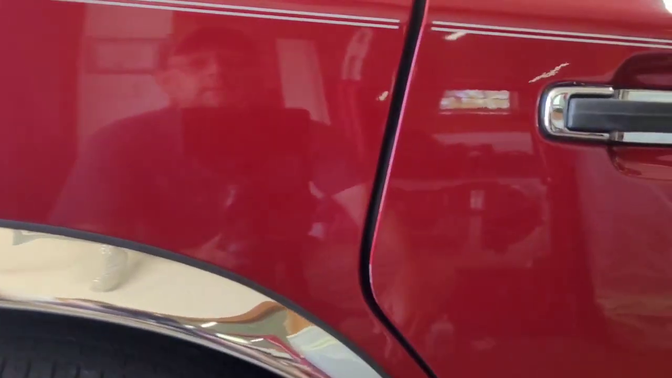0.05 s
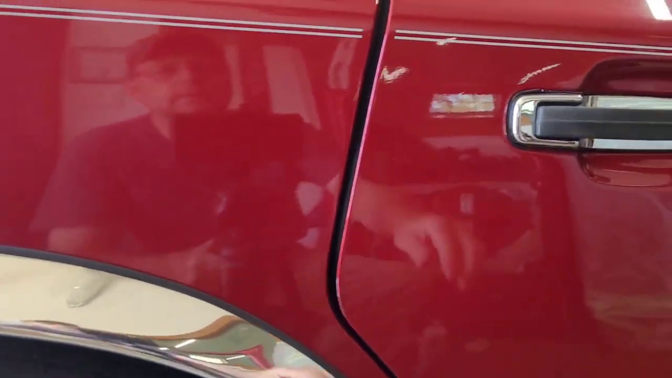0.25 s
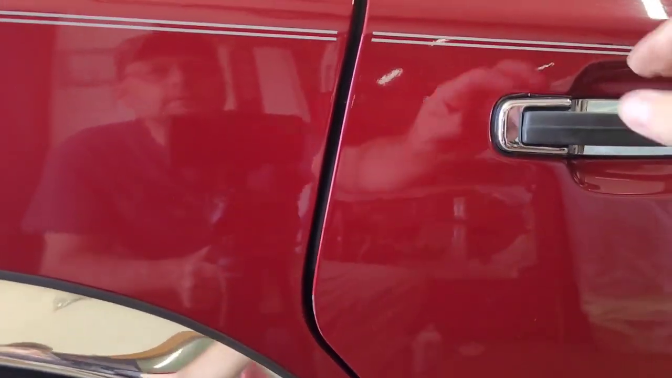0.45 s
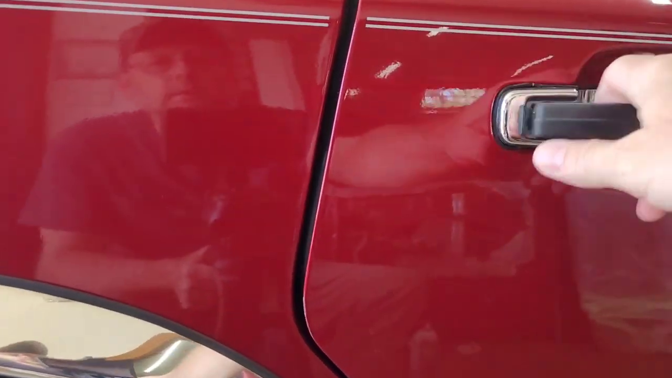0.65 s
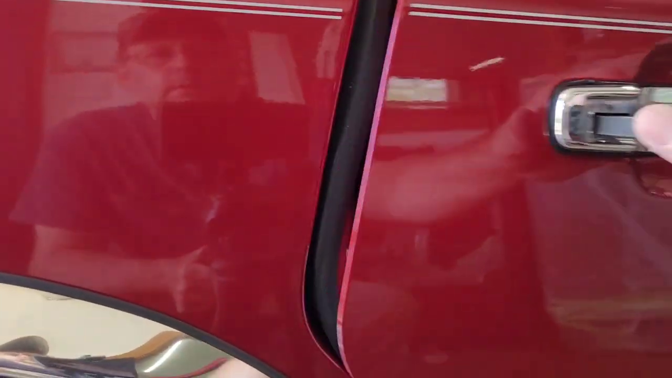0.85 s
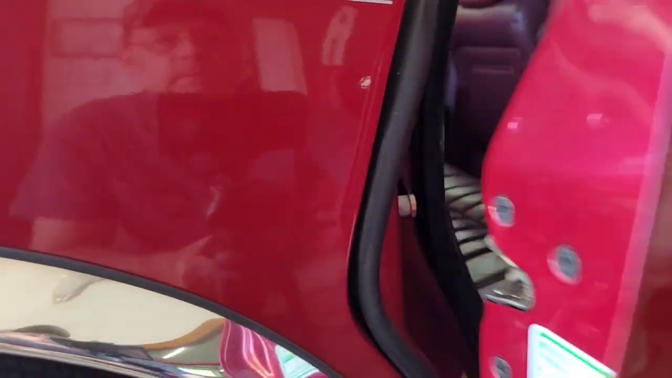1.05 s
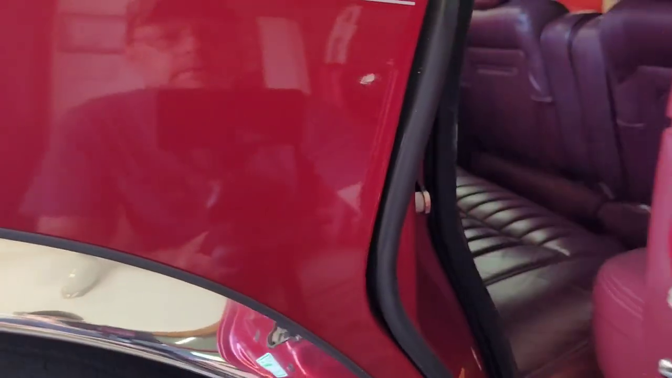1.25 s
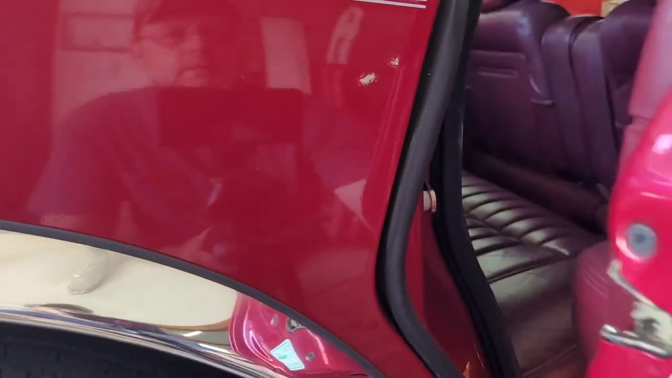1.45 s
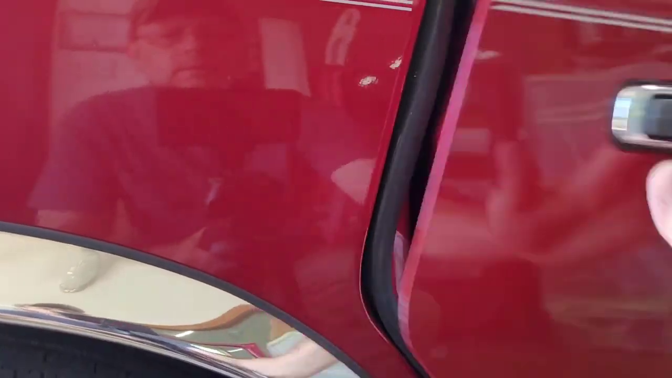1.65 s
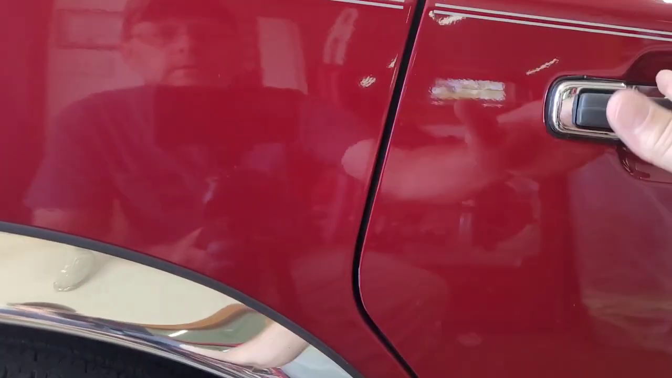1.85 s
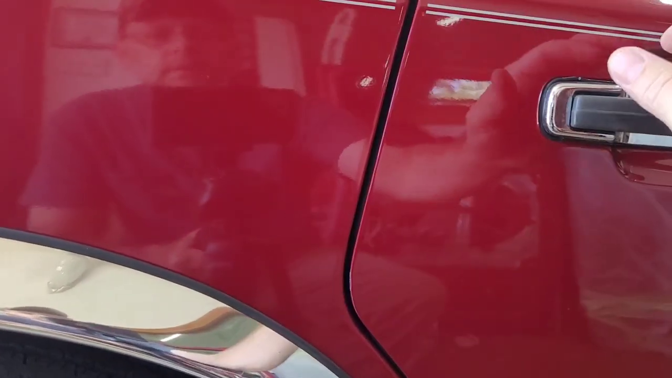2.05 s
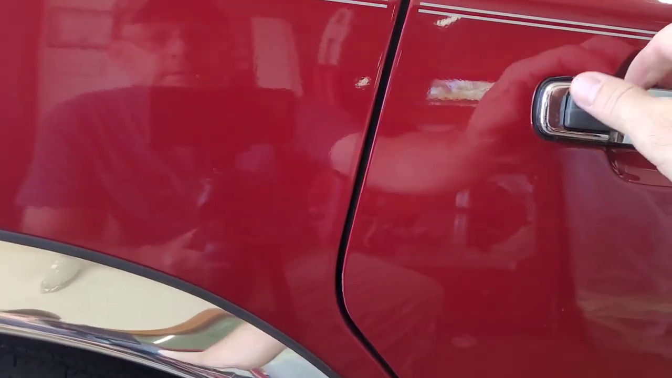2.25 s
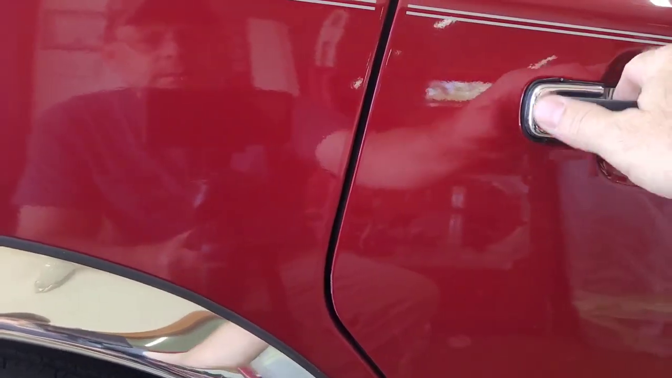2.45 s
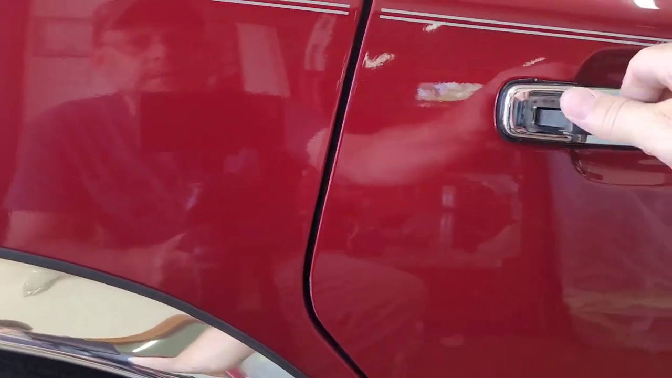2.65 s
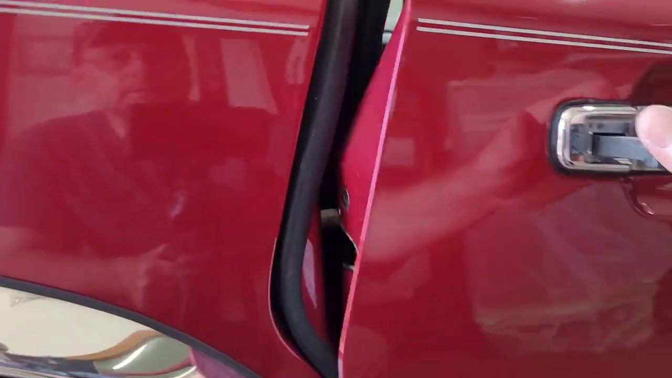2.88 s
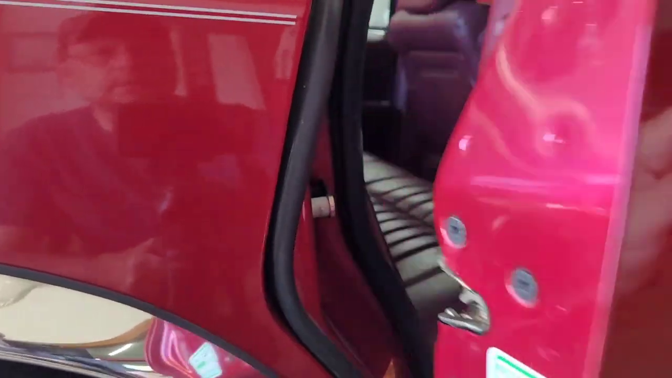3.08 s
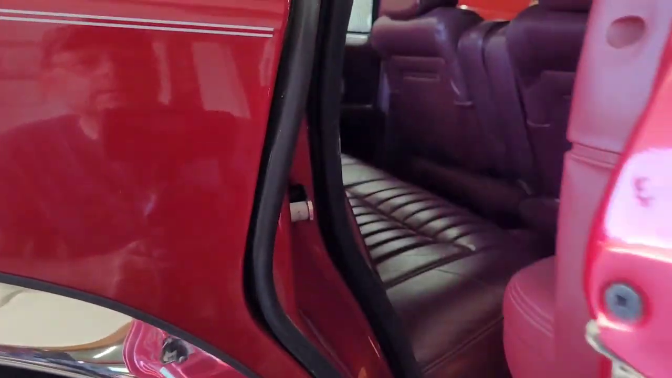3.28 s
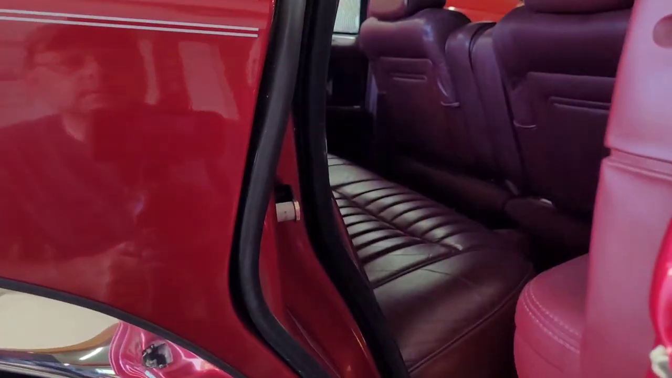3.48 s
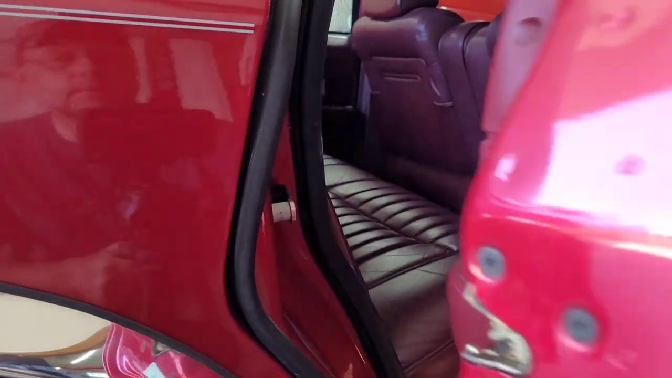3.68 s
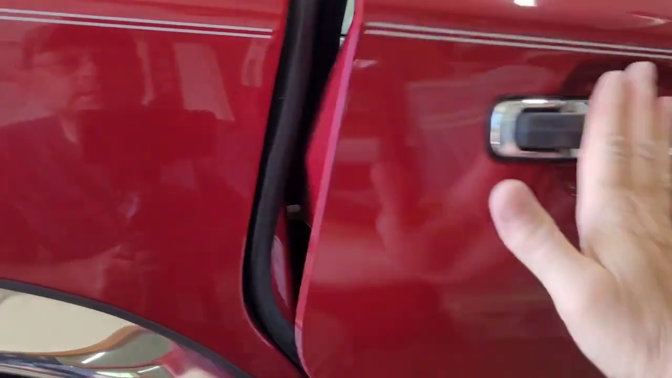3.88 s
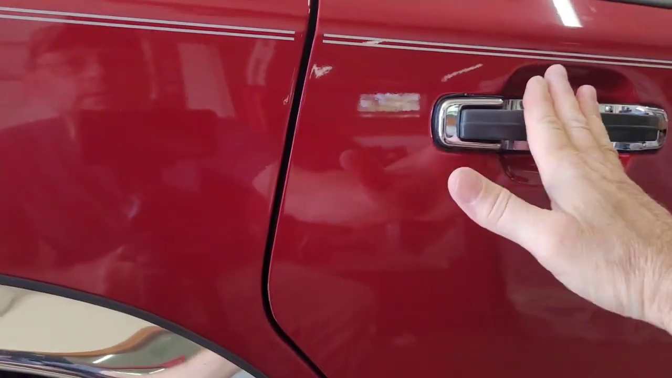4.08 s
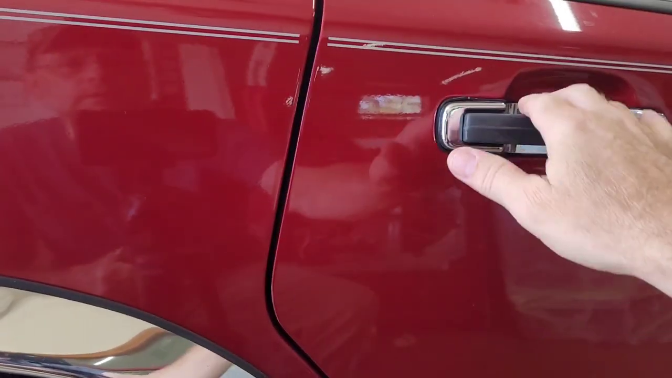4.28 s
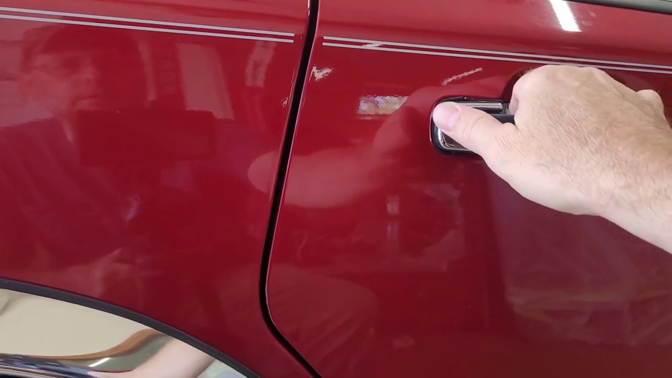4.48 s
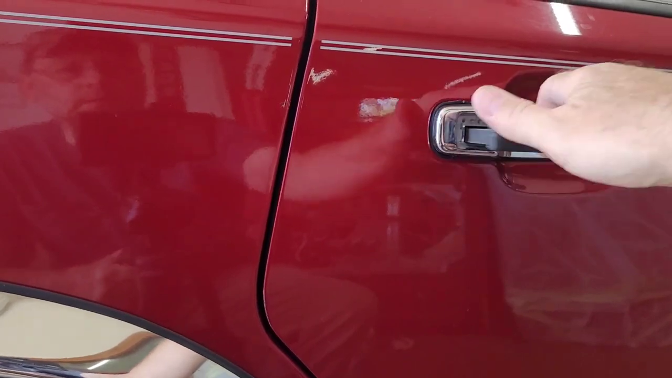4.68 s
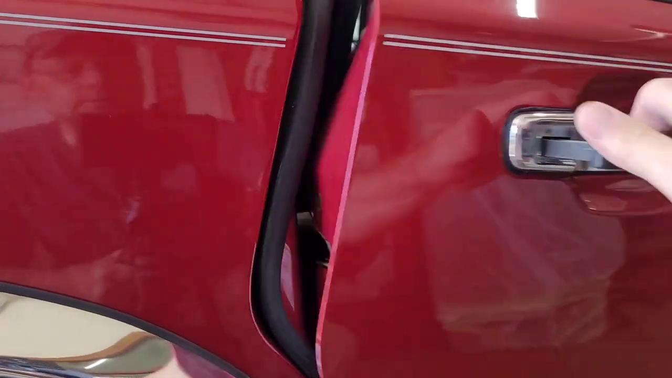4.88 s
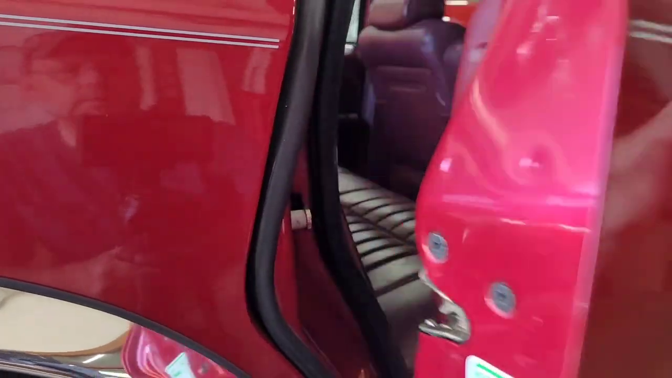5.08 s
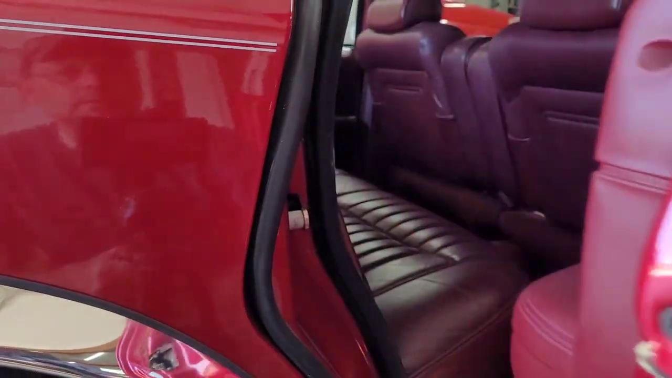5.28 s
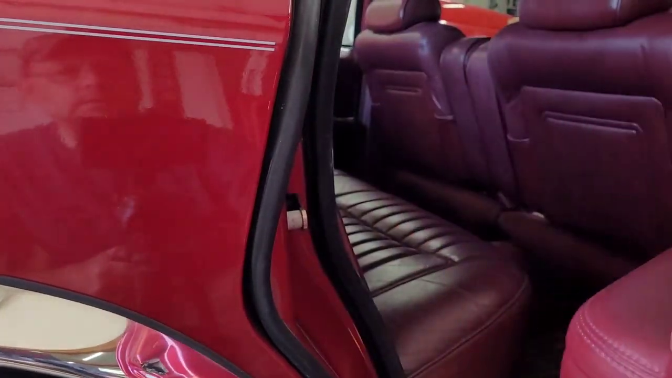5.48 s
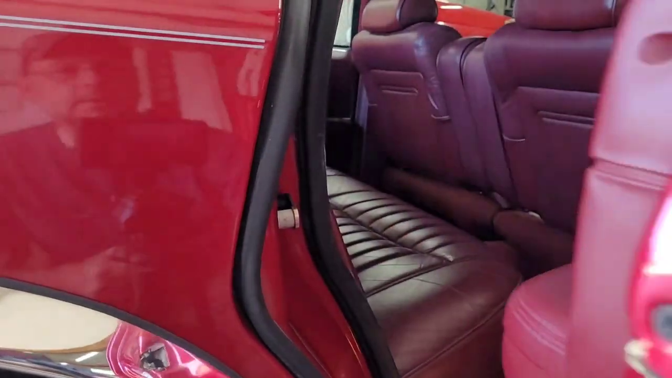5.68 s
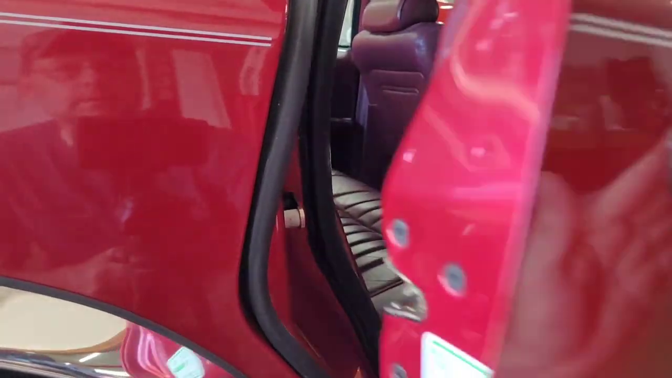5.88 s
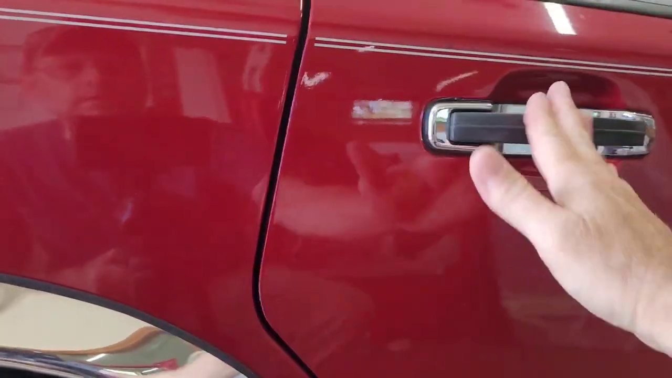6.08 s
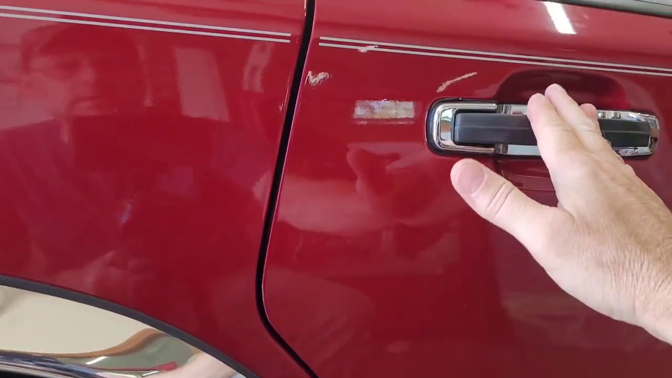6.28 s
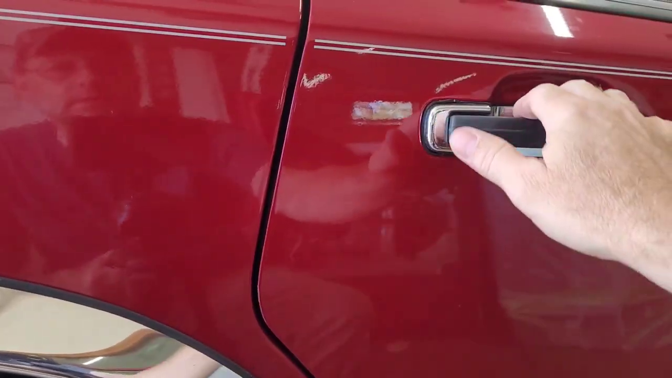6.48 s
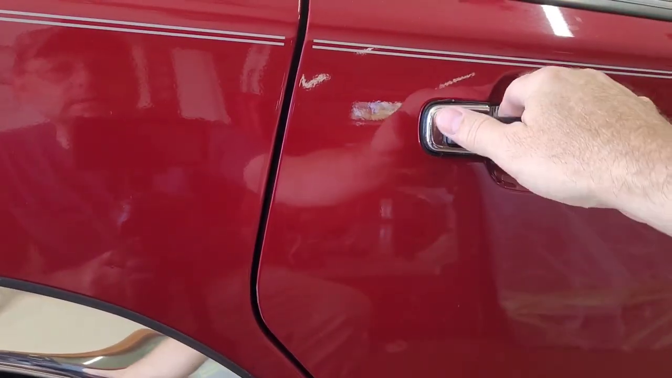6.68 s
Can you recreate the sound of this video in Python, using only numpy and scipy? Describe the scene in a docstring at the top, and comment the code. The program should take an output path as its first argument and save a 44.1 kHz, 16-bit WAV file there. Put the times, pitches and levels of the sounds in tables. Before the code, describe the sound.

Close, wide stereo in a quiet garage with very faint hiss and hum. At 0 s the low tail of an earlier door slam dies away, with a soft sleeve brush and tiny tick around 0.25 s. At 0.7-0.85 s a cluster of metallic handle and latch clicks snaps, the rubber seal popping and peeling with a low, fluttering puff. At 1.1 s the door stay gives a loud, hollow double clunk with ringing sheet metal. After a soft bump or two, the door slams at 1.74 s: bright latch clack, then a deep, tight thump, cabin boom, brief panel rattle and short echo. Lighter handle clicks at 2.6-2.8 s, clunk at 3.1 s, faint cloth, slam at 4.0 s. Clicks with a sharper latch snap at 4.7-4.8 s, clunk at 5.1 s, final slam at 6.1 s, its low tail and room echo fading into quiet by the end, about 6.6 s.

```python
"""Car door in a quiet garage

A car door is opened and shut three times, close to a two-port microphone; an earlier slam dies away at the start.
Shaped noise makes the clicks, the peeling seal, the cloth and the rush of air; decaying tones ring the metal parts.
The door stay clunks over its detent, then the latch clacks on the striker and the door thumps into its seal.
A diffuse noise tail makes the garage echo, and hiss with two faint hum tones makes its quiet."""
import sys
import numpy as np
from scipy import signal
from scipy.fft import rfft, irfft, next_fast_len
from scipy.io import wavfile
from scipy.ndimage import uniform_filter1d

SR = 44100
rng = np.random.default_rng(int(sys.argv[2]) if len(sys.argv) > 2 else 0)


def file_out(sig):
    """Save sig as 16-bit WAV at sys.argv[1]."""
    # one column per channel
    cols = np.atleast_2d(sig).T
    # limit, then scale
    lim = np.clip(cols, -1, 1)
    pcm = np.round(lim * 32767).astype(np.int16)
    wavfile.write(sys.argv[1], SR, pcm)


def gain_from_db(level_db):
    """Turn a decibel level (scalar or array-like) into a linear amplitude factor."""
    decades = np.asarray(level_db, float) / 20
    return 10 ** decades


N = 296953  # length in samples

# Spectra below give only a shape: the noise made from them is scaled to rms 1.
# Ring levels compare the tones of one part; their t60 is the fall by 60 dB while the part rings freely.

# hiss of the quiet garage: pitch_hz, level_db (per Hz)
HISS_SPECTRUM = [(18, -35), (30, -1.5), (80, -0.5), (190, -14), (261, -1.5), (420, -16.5), (480, -7.5),
                 (577, -21), (1340, -27.5), (2050, -7.5), (2810, -5), (3480, -27), (7090, -25.5),
                 (9000, -31.5), (16500, -32.5)]
# faint steady hum: pitch_hz, level_db
HUM_TONES = [(242.2, -81), (479.1, -82)]
# how fast the garage echo dies: pitch_hz, t60_s
ECHO_DECAY = [(50, 1), (130, 0.28), (350, 0.4), (920, 0.43), (2430, 0.5), (6400, 0.45), (11000, 0.39),
              (16000, 0.22)]
# strength of the reflections, weak in the bass so close to the door: pitch_hz, level_db
WALL_STRENGTH = [(50, -15), (120, -10), (300, -8), (1000, -2), (4000, 0), (16000, -2)]
# left-right likeness of noise, 1 = the same in both ports: pitch_hz, likeness
PORT_LIKENESS = [(60, 0.9), (180, 0.94), (550, 0.72), (1650, -0.11), (4970, -0.094), (15000, -0.12)]
# balance of the microphone ports: pitch_hz, left_minus_right_db
PORT_BALANCE = [(60, -4), (180, -2), (550, -3.5), (1650, -1), (4970, -3), (15000, -0.5)]

# a sleeve brushes as the arm moves: start_s, loudest_s, end_s, level_db
SLEEVE_STROKES = [(.17, 0.26, .36, -58.5), (.5, 0.514, 0.75, -69.5), (3.45, 3.508, 3.66, -65.5)]
# brushing cloth: pitch_hz, level_db (per Hz)
CLOTH_SPECTRUM = [(290, -16.5), (500, -1), (670, -12.5), (1370, -4.5), (2160, -5), (3210, -3.5),
                  (4050, -13), (7170, -10), (8540, -24.5), (11000, -14.5), (16500, -50)]
# soft low bumps of door and hand: start_s, level_db, pitch_hz, length_s
SOFT_BUMPS = [(0.224, -45.5, 55.8, .055), (1.362, -38, 52.8, 0.031), (1.466, -43.5, 66.5, 0.039),
              (2.352, -63.5, 56, 0.066), (3.375, -49, 250, .04), (3.721, -55.5, 48.9, 0.054),
              (5.425, -44.5, 254, 0.035), (5.77, -55, 50, 0.048)]

# the door is pulled off its seal: grip_s, latch_lets_go_s, seal_free_s, strain_db, peel_db
DOOR_PULLS = [(0.718, 0.788, .85, -37.5, -33.5), (2.582, 2.717, 2.806, -44.5, -33),
              (4.677, 4.747, 4.845, -46, -30.5)]
# peeling seal, also the air ahead of the closing door: pitch_hz, level_db (per Hz)
PEEL_SPECTRUM = [(18, -36.5), (30, -1.5), (233, -1.5), (308, -11), (572, -7), (631, -14), (1290, -24),
                 (1520, -21.5), (3500, -41.5), (4550, -71.5), (7700, -120)]

# handle and latch clicks: start_s, snap_db, knock_into_door_db, handle_ring_db
HANDLE_CLICKS = [(0.2496, -48.5, -53, -56), (0.503, -62, -57, -64), (0.7174, -43.5, -33, -24),
                 (0.7495, -40, -29.5, -34), (0.7795, -31.5, -23.5, -27), (0.7924, -22, -20, -15.5),
                 (0.8081, -22, -25.5, -25), (0.856, -26.5, -39, -33.5), (0.9526, -43, -50.5, -49),
                 (2.573, -46.5, -32, -32.5), (2.589, -38.5, -31, -36), (2.623, -52, -37, -45.5),
                 (2.7109, -39, -32.5, -40), (2.7659, -49, -31, -31.5), (2.8017, -26, -36, -41.5),
                 (4.67, -46.5, -29.5, -29), (4.6869, -37.5, -31, -40), (4.7471, -43, -30.5, -32.5),
                 (4.759, -17.5, -22, -25), (4.8016, -38.5, -35.5, -29), (4.8281, -26, -39.5, -31.5)]
# bright snap, before any tilt: pitch_hz, level_db (per Hz)
SNAP_SPECTRUM = [(180, -42.5), (300, 2), (754, -11.5), (1250, -5.5), (1870, -2), (4850, -16.5),
                 (7020, -9.5), (8730, -24), (11000, -15.5), (15200, -34), (16500, -32)]
# dull knock, also the brushing seal and the scraping roller, before any tilt: pitch_hz, level_db (per Hz)
KNOCK_SPECTRUM = [(59, -44), (100, -8), (234, 0.5), (458, -0.5), (595, -3.5), (725, -9.5), (854, -4),
                  (1490, -14), (2390, -29.5), (5000, -26), (6500, -65.5), (11000, -120)]
# ring of the handle: pitch_hz, level_db, t60_s
HANDLE_RING = [(634, -6.5, .06), (746, -2.5, .06), (824, 0.5, 0.097), (1050, -3.5, 0.1), (1300, -2.5, .04),
               (1963, 5.5, .07)]

# door stay rides over its detent: tick_s, creep_lead_s, tick_db, clunk_delay_s, clunk_db
STAY_DETENTS = [(1.094, .0295, -14, 0.01, -7), (3.1, 0.041, -15, .0125, -9),
                (5.123, 0.011, -18, .012, -9.5)]
# door swinging free: pitch_hz, level_db, t60_s
OPEN_DOOR_RING = [(138.5, -10.5, 0.74), (247, -8, 0.23), (278.7, -3, 0.45), (367, -14, 0.11),
                  (430, -15.5, .1), (558, -14.5, .1), (630, -17, 0.062), (754, -19, 0.062), (794, -7, 0.03),
                  (937, -3.5, 0.044), (1013, -7, 0.13), (2530, -17.5, 0.049), (3810, -11, 0.083)]
# panels and trim shaken by the stay: pitch_hz, level_db (per Hz)
RATTLE_SPECTRUM = [(35, -53), (60, -32), (304, -11.5), (412, -16), (874, -11.5), (1160, -23), (1610, -19.5),
                   (3840, -28), (4430, -33.5), (7420, -38.5), (8350, -47.5), (15000, -37), (16500, -54.5)]

# latch meets striker: start_s (below 0 = before the sound begins), clack_db, thump_delay_s, thump_db
DOOR_SLAMS = [(-.16, -8.5, .016, -4.5), (1.7398, -1, 0.018, -7.5), (3.9952, -3.5, 0.018, -5.5),
              (6.1132, -4, 0.016, -6.5)]
# ring of the latch: pitch_hz, level_db, t60_s
LATCH_RING = [(1285, -0.5, 0.014), (1862, -2.5, 0.027), (2106, -21, 0.58), (2377, -3.5, 0.018),
              (3480, -15.5, .04), (3876, -20.5, 0.28)]
# boom of the cabin: pitch_hz, level_db, t60_s
CABIN_BOOM = [(50.8, -1, 0.33), (59.5, -13, 0.66), (49, -16.5, 0.52), (78.53, -10.5, 0.11)]
# door held by its seal: pitch_hz, level_db, t60_s
SHUT_DOOR_RING = [(102, 3.5, 0.14), (129.5, -9.5, 0.97), (162, -8, 0.092), (211, 0.5, 0.17),
                  (250, -5.5, 0.2), (275, -18.5, 0.44), (286.2, -5.5, 0.31), (382, -16, 0.17),
                  (501, -11, 0.14), (574, -11, 0.21), (635, -15, 0.18), (695, -7.5, 0.059)]
# panels and trim shaken by a slam, before any tilt: pitch_hz, level_db (per Hz)
CRASH_SPECTRUM = [(71, -34), (120, -3.5), (430, -11.5), (574, -10.5), (782, -19.5), (1260, -16),
                  (1360, -18.5), (1540, -17), (2810, -22), (6950, -27.5), (8530, -38.5), (15200, -38.5),
                  (16500, -44)]
# car body rocking after a slam: pitch_hz, level_db (per Hz)
RUMBLE_SPECTRUM = [(15, -37), (25, -3), (65, 4), (128, -11.5), (153, -12.5), (174, -18.5), (232, -15),
                   (299, -27.5), (400, -21), (520, -50), (880, -120)]


def evened(x):
    """Scales to rms 1."""
    return x / np.sqrt(np.mean(x ** 2) + 1e-20)


def read(points, hz):
    """Reads between the points of a table, on a log-frequency axis."""
    pitch, value = np.transpose(points)
    return np.interp(np.log(hz + 1), np.log(pitch + 1), value)


def add(mix, start_s, sound):
    """Mixes a sound in at start_s, cut at both ends of the mix."""
    at = round(start_s * SR)
    sound = sound[..., max(-at, 0):]
    part = mix[:, max(at, 0):][:, :sound.shape[-1]]
    part += sound[..., :part.shape[1]]


def noise(spectrum, size, tilt_db=0):
    """Two-port noise of rms 1: bass alike in both ports, treble nearly unrelated; tilt_db is per octave."""
    hz = np.fft.rfftfreq(size, 1 / SR)
    left, other = rfft(rng.standard_normal((2, size)))
    same = np.clip(read(PORT_LIKENESS, hz), -1, 1)
    pair = np.array([left, same * left + np.sqrt(1 - same ** 2) * other])
    shape_db = read(spectrum, hz) + tilt_db * np.log2(hz / 3000 + 0.03)  # 0.03 bounds the tilt in the bass
    return evened(irfft(pair * gain_from_db(shape_db), size))


def burst(spectrum, rise_s, t60_s, tilt_db=0):
    """A puff of noise with a short rise and an exponential fall."""
    t = np.arange(next_fast_len(round(t60_s * SR) + 1024)) / SR
    envelope = (1 - np.exp(-t / rise_s)) * gain_from_db(-60 * t / t60_s)
    return noise(spectrum, len(t), tilt_db) * envelope


def ring(modes, contact_s, held_s, drop_db):
    """Tones struck by a rounded push; they ring freely while the part bounces, then rubber damps them. Peak 1."""
    longest_s = max(t60_s for *_, t60_s in modes)
    t = np.arange(round(longest_s * SR)) / SR
    # loose trim detunes the panels
    wander = uniform_filter1d(rng.standard_normal((len(modes), len(t))), round(0.015 * SR))
    free = np.zeros(len(t))
    for (hz, db, t60_s), bend in zip(modes, wander):
        free += gain_from_db(db - 60 * t / t60_s) * np.sin(2 * np.pi * hz * t + 12 * t * evened(bend))
    free *= gain_from_db(-drop_db / 2 * (1 + np.tanh((t - held_s) / 0.0072)))  # a smooth step down by drop_db
    struck = signal.fftconvolve(free, np.hanning(round(contact_s * SR) + 3))
    return struck / abs(struck).max()


def rub(mix, stroke, spectrum, jerk_db, smooth_s):
    """Noise under a stroke of (time_s, level_db) that catches and lets go in small jerks."""
    s, db = np.transpose(stroke)
    t = s[0] + np.arange(next_fast_len(round((s[-1] - s[0]) * SR))) / SR
    jerks = evened(uniform_filter1d(rng.standard_normal(len(t)), round(smooth_s * SR)))
    level = gain_from_db(np.interp(t, s, db) + jerk_db * jerks)
    level *= signal.windows.tukey(len(t), 0.1)  # soft ends
    add(mix, s[0], level * noise(spectrum, len(t)))


def hush():
    """The quiet of the garage: hiss with a slow swell and two faint hum tones."""
    hiss_db, swell_rms_db = -74.5, 0.5
    t = np.arange(N) / SR
    swell = np.zeros(N)
    for hz in np.geomspace(0.3, 8, 20):
        swell += np.sin(2 * np.pi * (hz * t + rng.random())) / np.sqrt(hz)
    level = gain_from_db(hiss_db + swell_rms_db * evened(swell))
    hiss = level * noise(HISS_SPECTRUM, next_fast_len(N))[:, :N]
    hum = sum(gain_from_db(db) * np.sin(2 * np.pi * hz * t) for hz, db in HUM_TONES)
    return hiss + hum


def garage(x):
    """Diffuse echo tail: every band of a noise pair dies at its own speed."""
    t = np.arange(SR) / SR
    hz = np.fft.rfftfreq(SR, 1 / SR)
    flat = rfft(noise([(20, 0), (20000, 0)], SR))
    centres = [centre for centre, _ in ECHO_DECAY]
    tail = np.zeros((2, SR))
    for row, (_, t60_s) in zip(np.eye(len(centres)), ECHO_DECAY):
        share = read(list(zip(centres, row)), hz)  # 1 at this centre, 0 at its neighbours
        tail += irfft(flat * share, SR) * gain_from_db(-60 * t / t60_s) / np.sqrt(t60_s)
    tail *= 1 - np.exp(-(t / 0.0094) ** 2)  # reflections need time to arrive
    tail /= np.linalg.norm(tail[0])
    tail = irfft(rfft(tail) * gain_from_db(read(WALL_STRENGTH, hz)), SR)
    return signal.fftconvolve(x.mean(0)[None], tail, axes=1)


def sleeve(mix):
    """Cloth brushes in, swells and stops."""
    in_db, out_db, edge_s = 8.5, 7, 0.016
    for start, loudest, end, db in SLEEVE_STROKES:
        stroke = [(start - edge_s, db - 3 * in_db), (start, db - in_db), (loudest, db),
                  (end, db - out_db), (end + edge_s, db - 4 * out_db)]
        rub(mix, stroke, CLOTH_SPECTRUM, jerk_db=0.82, smooth_s=0.0065)


def bumps(mix):
    """Rounded wave packets with a soft start."""
    for s, db, hz, length_s in SOFT_BUMPS:
        t = np.arange(round(length_s * SR)) / SR
        add(mix, s, gain_from_db(db) * np.sin(2 * np.pi * hz * t) * np.hanning(len(t)))


def swings(mix):
    """A low rush of air, pushed ahead of the door, grows as the door swings shut."""
    swing_s, end_db, rise_db = 0.12, -57.5, 20
    for s, *_ in DOOR_SLAMS[1:]:
        stroke = [(s - swing_s, end_db - rise_db), (s, end_db)]
        rub(mix, stroke, PEEL_SPECTRUM, jerk_db=1.3, smooth_s=0.012)


def peels(mix):
    """The seal strains under the grip, pops as the latch lets go, peels along the frame and fades."""
    grip_rise_s, grip_rise_db, pop_rise_s = 0.045, 32, 0.026
    strain_db_per_s, peel_db_per_s = 11.5, -86.5
    drop_s, drop_db, fade_s, fade_db = 0.032, 12, 0.12, 17.5  # once free: a quick drop, then a slower fade
    for grip, pop, free, strain_db, peel_db in DOOR_PULLS:
        last_db = peel_db + peel_db_per_s * (free - pop)
        stroke = [(grip - grip_rise_s, strain_db - grip_rise_db),
                  (grip, strain_db),
                  (pop - pop_rise_s, strain_db + strain_db_per_s * (pop - grip)),
                  (pop, peel_db),
                  (free, last_db),
                  (free + drop_s, last_db - drop_db),
                  (free + drop_s + fade_s, last_db - drop_db - fade_db)]
        rub(mix, stroke, PEEL_SPECTRUM, jerk_db=3.1, smooth_s=0.0072)


def clicks(mix):
    """Each click is a short bright snap, a dull knock into the door and a brief ring of the handle."""
    for s, snap_db, knock_db, ring_db in HANDLE_CLICKS:
        tilt_db = -0.2 + 0.12 * (snap_db - knock_db)  # brighter as the snap outweighs the knock
        contact_s = 0.0004 * gain_from_db(0.54 * (ring_db - snap_db))  # shorter as the snap outweighs the ring
        add(mix, s, gain_from_db(snap_db) * burst(SNAP_SPECTRUM, 0.0002, 0.028, tilt_db))
        add(mix, s, gain_from_db(knock_db) * burst(KNOCK_SPECTRUM, 0.00069, 0.065))
        add(mix, s, gain_from_db(ring_db) * ring(HANDLE_RING, contact_s, held_s=0.01, drop_db=4))


def detents(mix):
    """The roller creeps, ticks as it climbs, then two clunks ring the open door, which radiates no deep bass."""
    creep_db, creep_t60_s = -51.5, 0.11
    climb_db, climb_s = -38.5, 0.004  # the scrape swells into the tick
    bass_cut = signal.butter(2, 90, "high", fs=SR)
    for s, lead, tick_db, delay, clunk_db in STAY_DETENTS:
        add(mix, s - lead, gain_from_db(creep_db) * burst(KNOCK_SPECTRUM, 0.001, creep_t60_s, tilt_db=1.0))
        t = np.arange(-6 * climb_s, 0, 1 / SR)
        climb = np.exp(t / climb_s) * noise(KNOCK_SPECTRUM, len(t), tilt_db=2.0)
        add(mix, s + t[0], gain_from_db(climb_db) * climb)
        for after, db in ((0, -6), (delay / 2, 0.5)):
            add(mix, s + after, gain_from_db(tick_db + db) * burst(SNAP_SPECTRUM, 0.0007, 0.035, tilt_db=2.5))
        clunk_s = s + delay
        for after, db, contact_s in ((0, 0.5, 0.0002), (0.0071, 0.96, 0.001)):
            clunk = signal.lfilter(*bass_cut, ring(OPEN_DOOR_RING, contact_s, held_s=0.042, drop_db=16))
            add(mix, clunk_s + after, gain_from_db(clunk_db + db) * clunk)
        add(mix, clunk_s - 0.001, gain_from_db(clunk_db - 16) * burst(SNAP_SPECTRUM, 0.00031, 0.025, tilt_db=0.5))
        add(mix, clunk_s, gain_from_db(clunk_db - 1) * burst(RATTLE_SPECTRUM, 0.00068, 0.12))


def slams(mix):
    """Seal brush, latch catches, then the boom of the cabin, the shaken panels and the rocking body."""
    for s, clack_db, delay, thump_db in DOOR_SLAMS:
        s += 0.5  # this mix starts half a second early
        add(mix, s - 0.017, gain_from_db(thump_db - 29.5) * burst(KNOCK_SPECTRUM, 0.0057, 0.22, tilt_db=1.5))
        add(mix, s - 0.002, gain_from_db(clack_db - 16) * burst(CRASH_SPECTRUM, 0.0011, 0.016, tilt_db=2.0))
        for after, db in ((0, -2.5), (0.0035, 3), (delay - 0.003, 1.5)):
            catch = ring(LATCH_RING, 0.0001, held_s=0.016, drop_db=9.5)
            add(mix, s + after, gain_from_db(clack_db + db - 2) * catch)
        add(mix, s, gain_from_db(clack_db - 10.5) * burst(CRASH_SPECTRUM, 0.0007, 0.08, tilt_db=1.15))
        thump_s = s + delay
        boom = -ring(CABIN_BOOM, 0.0027, held_s=0.067, drop_db=19)  # minus: air is pushed out first
        add(mix, thump_s, gain_from_db(thump_db + 2.5) * boom)
        thump = ring(SHUT_DOOR_RING, 0.0017, held_s=0.076, drop_db=8)
        add(mix, thump_s - 0.0045, gain_from_db(thump_db + 0.5) * thump)
        add(mix, thump_s - 0.004, gain_from_db(thump_db - 2.5) * burst(CRASH_SPECTRUM, 0.002, 0.19))
        add(mix, thump_s, gain_from_db(thump_db - 13.5) * burst(RUMBLE_SPECTRUM, 0.0088, 0.54))


def scene():
    """The door sounds, begun half a second early so that the first tail is already in the room."""
    early = SR // 2
    door = np.zeros((2, N + early))
    audible = door[:, early:]  # a view: sounds added here land in door
    for source in (sleeve, bumps, swings, peels, clicks, detents):
        source(audible)
    slams(door)
    wet = door + gain_from_db(-7.0) * garage(door)[:, :door.shape[1]]
    return wet[:, early:] + hush()


def roll_off(x):
    """The treble ends steeply here."""
    return signal.sosfilt(signal.butter(12, 16820, fs=SR, output="sos"), x)


def record(dry):
    """Balance and bass cut of the two ports, a soft knee near full scale, then the band limit."""
    size = next_fast_len(N)
    hz = np.fft.rfftfreq(size, 1 / SR)
    balance_db = np.outer([0.5, -0.5], read(PORT_BALANCE, hz))
    ports = irfft(rfft(dry, size) * gain_from_db(balance_db), size)[:, :N]
    heard = signal.lfilter(*signal.butter(2, 30, "high", fs=SR), ports)
    soft = heard / (1 + (heard / 0.97) ** 6) ** (1 / 6)
    band_limit = signal.firwin(255, 16300, window=("kaiser", 8), fs=SR)
    finished = signal.oaconvolve(soft, band_limit[None], "same")
    return roll_off(finished)


dry = scene()
out = record(dry)
file_out(out)
```